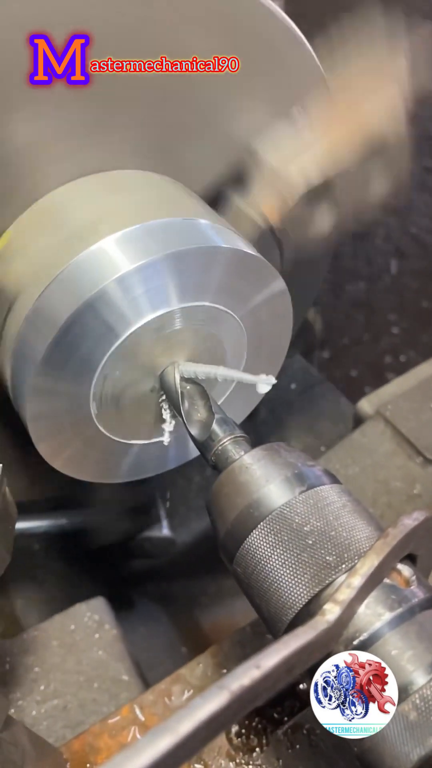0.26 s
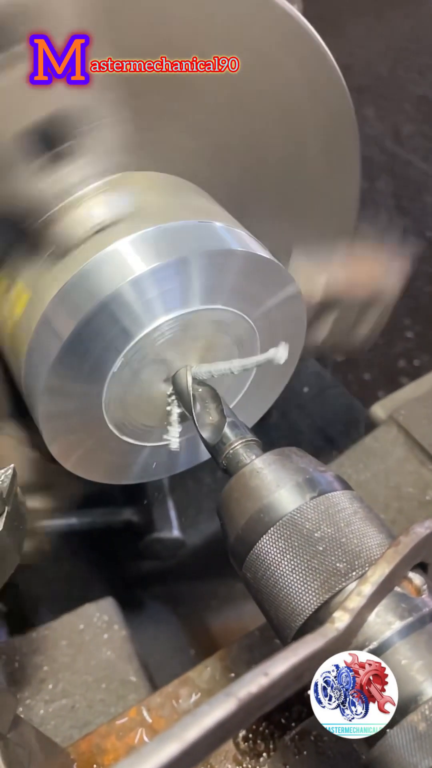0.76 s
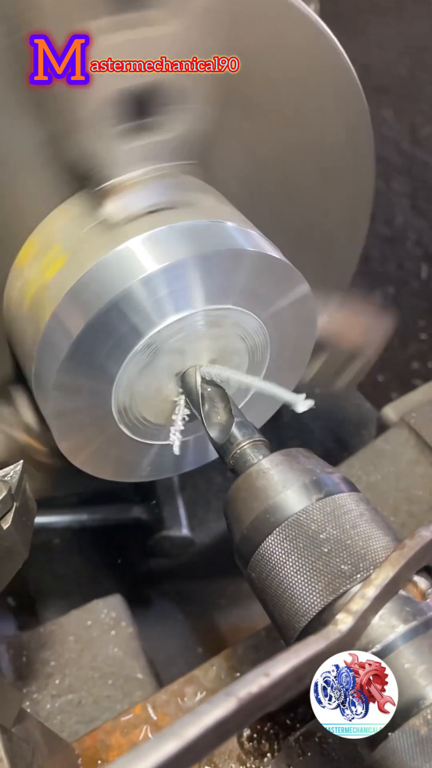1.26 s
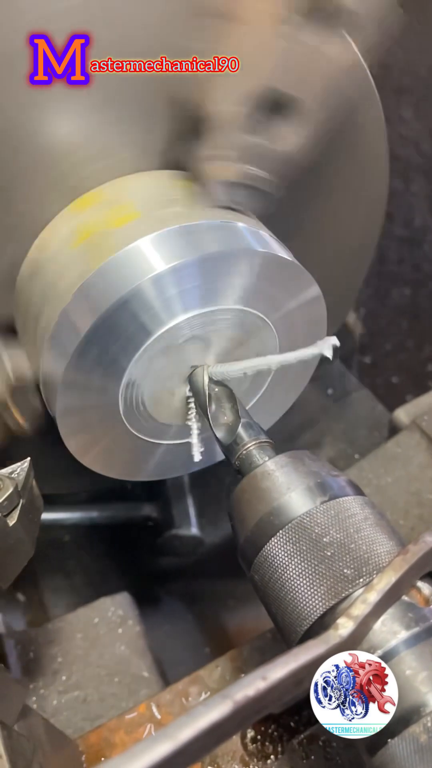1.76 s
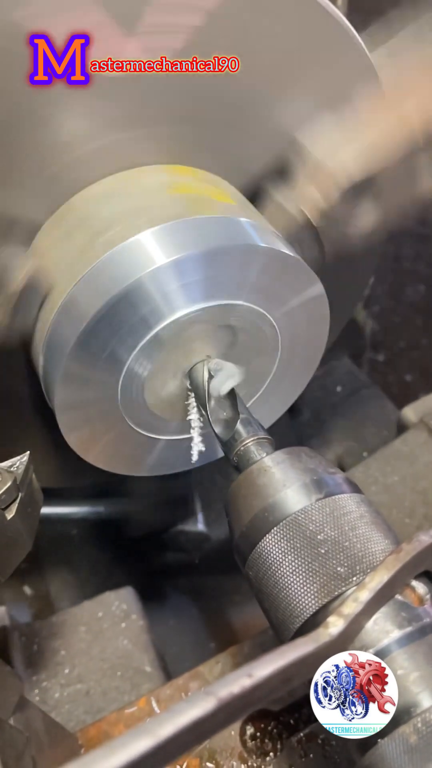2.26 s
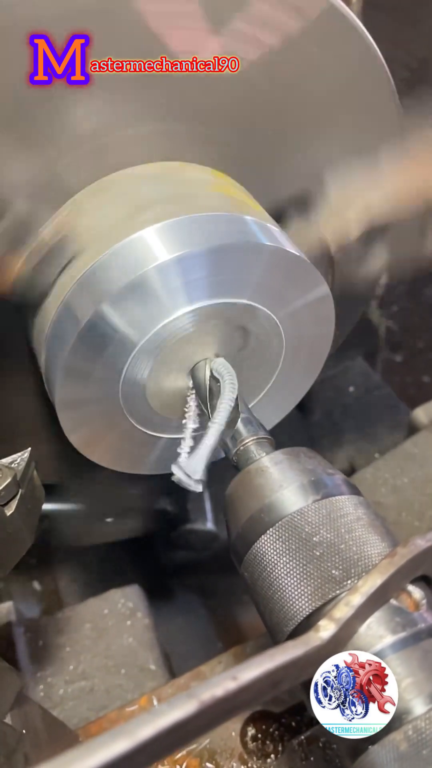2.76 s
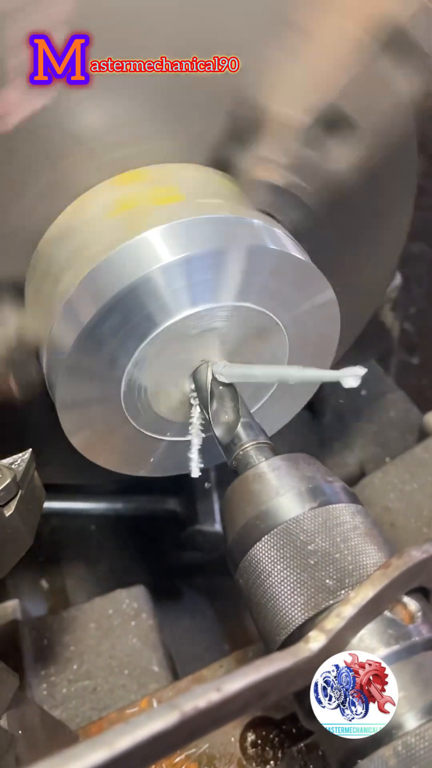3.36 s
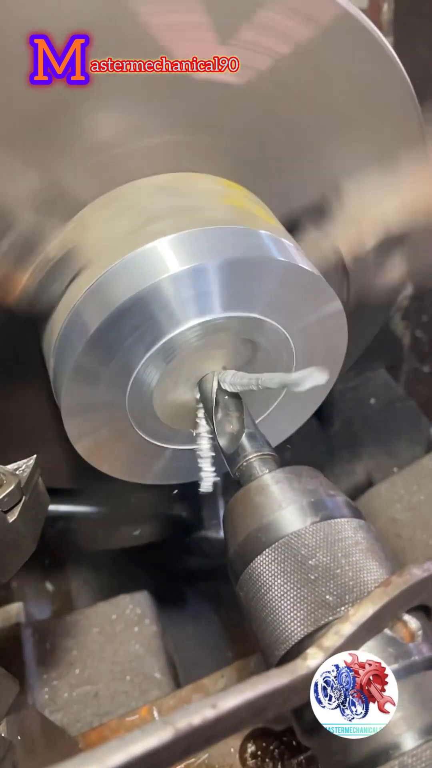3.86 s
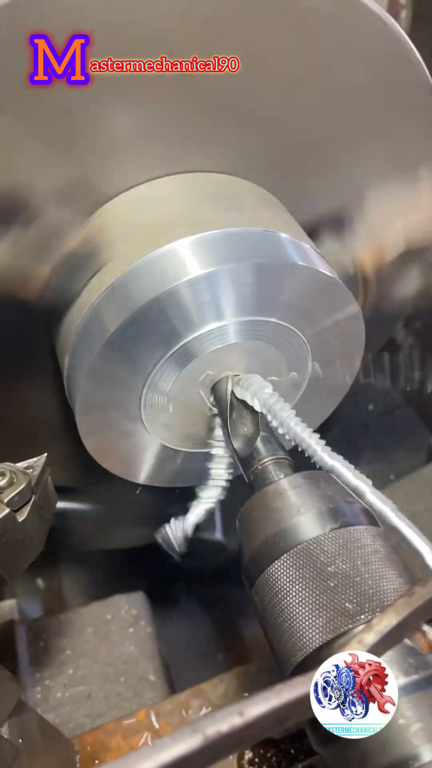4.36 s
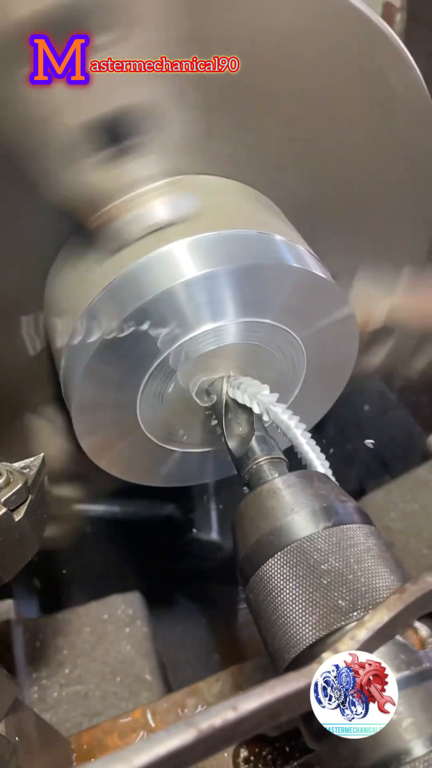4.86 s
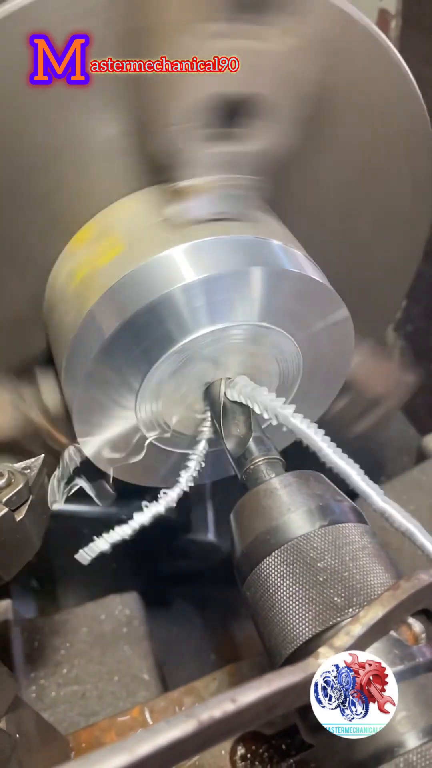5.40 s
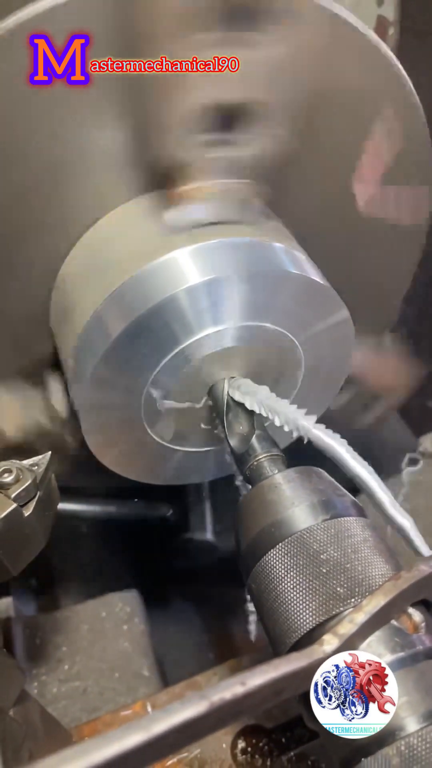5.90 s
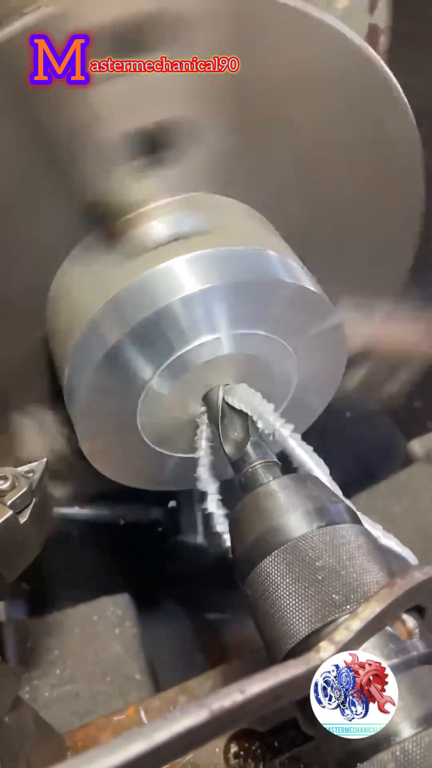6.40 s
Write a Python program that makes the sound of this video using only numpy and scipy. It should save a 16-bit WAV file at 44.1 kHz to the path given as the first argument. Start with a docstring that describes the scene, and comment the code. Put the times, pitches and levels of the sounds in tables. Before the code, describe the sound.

Slowed, muffled machine rumble and drill hiss ramp up in pitch and loudness to bright squealing drilling, ending in a brief broad scraping cut.

```python
"""Gear whine and gearbox roar come first, at quarter speed and held down in level, with the drill's hiss over them.
Place: a workshop lathe drilling a steel part; distance: close; microphone: one phone with two ports.
Playback steps up to full speed and gets louder; after the last splice a boring bar cuts instead of the drill.
Hiss, roar and boring are shaped noise with resonances, gears and hum are sines, the squeal is a tone with noise.
"""
import sys
import numpy as np
from scipy import signal
from scipy.fft import rfft, irfft, next_fast_len
from scipy.io import wavfile
from scipy.ndimage import uniform_filter1d, map_coordinates

SR = 44100
rng = np.random.default_rng(int(sys.argv[2]) if len(sys.argv) > 2 else 0)


def int16_out(signal):
    """Quantize to a 16-bit WAV file."""
    q = np.round(np.clip(np.atleast_2d(signal).T, -1, 1) * 32767)
    wavfile.write(sys.argv[1], SR, q.astype(np.int16))


N = 292824  # samples as played

# In every table t is as played, f is at workshop speed, and source levels are before the playback volume.
# Spectrum and mode levels set only the shape of a layer, which is then brought to rms 1.

# Layers of the drilling noise: t/s, then level/dB of rub, upper rub, low whistle, high whistles, sizzle, fizz
DRILL_FEED = [(0, -31.5, -47.5, -32.5, -49.5, -84, -62.5), (1.2, -29, -48, -35, -47, -95, -64.5),
              (2.5, -28.5, -41.5, -43, -45, -63, -60.5), (4.17, -30, -42, -50, -45, -53.5, -61),
              (4.19, -27.5, -38.5, -35.5, -46.5, -50, -52.5), (5.14, -27, -37, -43, -46.5, -49.5, -55.5),
              (5.6, -27.5, -39, -35, -43, -56, -50.5), (6.45, -26.5, -37, -35.5, -40.5, -52.5, -58)]
# Drill rubbing on steel: f/Hz, level/dB per Hz
RUB_SPECTRUM = [(1500, -120), (3000, -26), (4500, -13), (5000, -13.5), (6300, -7.5), (7700, -9.5),
                (8800, -3.5), (9500, -13), (10500, -16), (11000, -20), (12100, -24), (12700, -45.5),
                (13200, -120)]
# Modes of drill, chuck and tailstock rung by the rubbing: f/Hz, width/Hz, level/dB per Hz
TOOLING_MODES = [(3050, 55, -15), (4235, 150, -5), (4446, 51, -3.5), (4630, 24, -3), (5580, 250, -4),
                 (6470, 60, -13), (6540, 180, -6), (7205, 140, -4.5), (8350, 36, -1), (8700, 120, -3.5),
                 (8830, 73, 2.5), (9800, 150, -7), (9890, 150, 1.5), (10360, 160, -3.5)]
# Thin modes of the flutes: f/Hz, width/Hz, level/dB
LOW_WHISTLE_MODES = [(10085, 85, 0)]
# High thin whistles: f/Hz, width/Hz, level/dB
HIGH_WHISTLE_MODES = [(11385, 75, 0), (12290, 55, -10)]
# Two finer layers: f/Hz, level/dB
SIZZLE_SPECTRUM = [(11000, -54.5), (11800, 8.5), (12700, 3), (13300, -4), (15200, -8.5), (16000, -54)]
FIZZ_SPECTRUM = [(15000, -52.5), (15500, -21), (17000, 3.5), (17900, 9), (19000, 6.5), (19350, -2.5),
                 (19800, -82.5)]
UPPER_HZ = 10420  # crossover; the hiss above this has its own level column, weak at first and stronger later


def drill(n):
    """Rubbing hiss surging in the tooling's modes, with thin whistles and the finer sizzle and fizz."""
    levels_db = [np.interp(np.arange(n), real_time(), c) for c in curves(DRILL_FEED)]
    rub_db, upper_db, low_db, high_db, sizzle_db, fizz_db = levels_db
    rub = both(RUB_SPECTRUM, TOOLING_MODES)

    def upper_share(hz):
        """Share of the rubbing's power in the upper part, crossing over within 300 Hz."""
        return np.clip(.5 + (hz - UPPER_HZ) / 300, 0, 1)

    def lower_rub(hz):
        """Gain of the rubbing below the crossover."""
        return rub(hz) * np.sqrt(1 - upper_share(hz))

    def upper_rub(hz):
        """Gain of the rubbing above the crossover."""
        return rub(hz) * np.sqrt(upper_share(hz))

    surge_db = 0.58 * wobble(16, n)  # shared by both parts of the rubbing
    hiss = amp(rub_db + surge_db) * noise(lower_rub, n, patchy_db=2.0, span=8)
    hiss += amp(upper_db + surge_db) * noise(upper_rub, n, patchy_db=2.0, span=8)
    hiss += amp(low_db) * noise(ringing(LOW_WHISTLE_MODES), n, patchy_db=3.0, span=4)
    hiss += amp(high_db) * noise(ringing(HIGH_WHISTLE_MODES), n, patchy_db=2.5, span=4)
    sizzle_surge_db = 3 * wobble(16, n)
    hiss += amp(sizzle_db + sizzle_surge_db) * noise(shaped(SIZZLE_SPECTRUM), n, patchy_db=2.8, span=10)
    return hiss + amp(fizz_db) * noise(shaped(FIZZ_SPECTRUM), n, patchy_db=1.5, span=10)


# Steady squeal, which dips and later grows as the drill bites deeper: t/s, level/dB
STEADY_SQUEAL = [(0, -48.5), (2, -55.5), (3.4, -52), (4.17, -44.5), (4.19, -47.5), (5.1, -38.5), (5.5, -39),
                 (6.45, -38.5)]
# The edge catches and the squeal flares: t/s of the middle, length/s as played, level/dB
EDGE_CATCHES = [(4.314, 0.027, -30), (4.544, 0.023, -26), (4.705, 0.017, -22), (4.778, 0.057, -30.5),
                (4.875, 0.044, -31.5), (4.965, .03, -37), (5.07, 0.036, -27), (5.134, .025, -26),
                (5.523, 0.026, -47), (5.573, .025, -35.5), (5.606, .03, -42), (5.878, .029, -34),
                (5.941, 0.041, -29), (6.024, 0.025, -27.5), (6.09, 0.076, -33), (6.115, 0.013, -28),
                (6.165, 0.017, -26), (6.21, .03, -34), (6.252, 0.039, -26.5), (6.346, .053, -29.5),
                (6.412, 0.056, -28.5)]
# Pitch before drift and playback speed: t/s, f/Hz
SQUEAL_PITCH = [(4.1, 5620), (4.54, 5720), (4.8, 5600), (5.1, 5680), (5.52, 5760), (5.58, 5650),
                (5.9, 5745), (6.12, 5705), (6.3, 5740)]
# Modes rung by the rough part: f/Hz, width/Hz, level/dB
SHANK_MODES = [(5730, 190, 0), (11390, 60, -16)]


def squeal(n):
    """Stick-slip at the cutting edge: a fluttering tone with rough noise around it; both flare at each catch."""
    t, now = np.arange(N) / SR, real_time()
    flares = sum(amp(db) * np.exp(-(2 * (t - s) / length) ** 2) for s, length, db in EDGE_CATCHES)
    steady = amp(curves(STEADY_SQUEAL)[0])
    flutter, drift = [np.interp(now, np.arange(n), wobble(rate, n)) for rate in (130, 90)]
    workshop_hz = curves(SQUEAL_PITCH)[0] + 25 * drift
    speed = np.gradient(now)
    phase = 2 * np.pi * np.cumsum(workshop_hz * speed) / SR
    side_phase = np.array([[-.08], [.08]])  # rad, left and right
    tone = amp(2.4 * flutter) * np.sin(phase + side_phase)
    rough = played(noise(ringing(SHANK_MODES), n, patchy_db=0.6, span=60))
    rough_size = amp(-2.5) * steady + amp(-14.5) * flares
    return (steady + flares) * tone + rough_size * rough


# Cutting noise of the boring bar: f/Hz, level/dB per Hz
BORING_SPECTRUM = [(20, -10), (45, -7), (200, -5.5), (400, -8), (950, -1.5), (1300, -12), (1750, -3),
                   (2200, -6), (3000, -10.5), (4800, -27), (5400, -19.5), (6300, -28), (10000, -24.5),
                   (11500, -34.5), (12400, -71.5)]
# Modes of the bar: f/Hz, width/Hz, level/dB
BAR_MODES = [(970, 63, -0.5), (1820, 28.8, -4), (3070, 40, -4.5), (3300, 35, -17), (5530, 91, -24.5)]


def boring_bar(n):
    """Broad cutting noise with the bar's own modes standing on it."""
    return amp(-20.0) * noise(both(BORING_SPECTRUM, BAR_MODES), n, patchy_db=2.5, span=3)


# Two gear pairs, and other tones of the drive: f/Hz
MESH_HZ, HUM_HZ = (850.8, 916), (371, 457.6, 716, 895.5)
# Those tones and harmonics of the gear pairs:
# f/Hz, level/dB while drilling, level/dB while boring, left lead/rad, left-right level/dB, unsteadiness/dB
GEAR_TONES = [(MESH_HZ[0], -30, -35, 1.5, 2.5, 2.2), (2 * MESH_HZ[0], -32.5, -35, 0.1, .3, 1.3),
              (3 * MESH_HZ[0], -48, -38, 1.1, -.3, 3), (4 * MESH_HZ[0], -54, -54, 1.6, .3, 4), (MESH_HZ[1],
              -38, -41, 1.1, -1, 3.5), (2 * MESH_HZ[1], -43, -40, 0.1, .3, 4), (HUM_HZ[0],
              -44, -49, .2, .3, 3), (HUM_HZ[1], -43, -45, .3, .3, 4), (HUM_HZ[2], -44, -46, .8, .3, 3),
              (HUM_HZ[3], -41, -46, 1.2, .3, 3.5)]


def gears(n):
    """Tones waver in size and phase as the load on the teeth changes, a little apart on each side."""
    t = np.arange(n) / SR
    boring = np.arange(n) > real_time()[round(SPLICE_TIMES[-1] * SR)]
    out, side = np.zeros((2, n)), np.array([[.5], [-.5]])
    for hz, drill_db, bore_db, lead, pan_db, unsteady_db in GEAR_TONES:
        waver_db = unsteady_db * np.array([wobble(24.98, n), wobble(25.32, n)])
        size = amp(np.where(boring, bore_db, drill_db) + pan_db * side + waver_db)
        shared_turn = .12 * unsteady_db * wobble(30, n)
        side_turn = (lead + .25 * unsteady_db * wobble(22.45, n)) * side
        out += np.sqrt(2) * size * np.sin(2 * np.pi * hz * t + shared_turn + side_turn)
    return out


# A low hum that swells once a spindle turn: t/s of the peak, level/dB, length/s in workshop time
HUM_SWELLS = [(1.266, -30.5, 0.03), (3.206, -31, 0.031), (4.6, -31.5, 0.042), (5.615, -29.5, 0.023),
              (6.099, -28, 0.053)]
SWELL_HZ = 301.2  # at workshop speed


def swells(n):
    """The low hum rises and fades around each peak, alike on both sides."""
    t = np.arange(n) / SR
    size = np.zeros(n)
    for s, db, length in HUM_SWELLS:
        peak_s = real_time()[round(s * SR)] / SR
        size += amp(db) * np.exp(-.5 * ((t - peak_s) / length) ** 2)
    return np.sqrt(2) * size * np.sin(2 * np.pi * SWELL_HZ * t) * np.ones((2, 1))


# Gearbox and bed: f/Hz, level/dB per Hz
ROAR_SPECTRUM = [(15, -26), (45, -6.5), (100, -8), (250, -3.5), (500, -1.5), (900, 3), (1100, -3),
                 (1350, -7), (1750, 0.5), (2000, -4), (2550, -4.5), (2900, -10.5), (4400, -14), (6000, -49),
                 (9000, -120)]


def gearbox_roar(n):
    """Broad noise of gearbox and bed, at a constant level under the drilling."""
    return amp(-24) * noise(shaped(ROAR_SPECTRUM), n, patchy_db=1.74, span=3)


# Stereo image of the noise by frequency:
# f/Hz, likeness 0-1, left lead/rad beyond a common delay, left-right level/dB
STEREO_IMAGE = [(40, .985, 0, .1), (200, .979, -.27, .6), (550, .544, -.5, -2.2), (900, .56, .7, 0),
                (1250, .322, -.8, -1.1), (1600, .8, -1.55, 1.1), (2200, .498, -2, -.7),
                (2700, .414, .65, -1.5), (4000, .7, -3, -.5), (4650, .624, -1.6, -3), (5700, .944, .45, 1),
                (6500, .87, .5, -2.5), (8200, .92, .75, 0), (9150, .995, .3, 0), (9600, .995, -.1, 0),
                (11200, .8, .4, 0), (12700, .995, -.1, 0), (19000, .92, -.4, 0)]
NEAR_LEAD_S = .000158  # the common delay: the near drill reaches the left port first; used for all noise
EDGE_HZ = 19500  # upper limit of the noise at workshop speed


def noise(gain, n, patchy_db, span):
    """Stereo noise of rms 1 with the image above and patches of random gain, smoothed over span bands."""
    z = signal.stft(rng.standard_normal((2, n)), nperseg=256)[2]
    field = uniform_filter1d(rng.standard_normal(z.shape[1:]), size=span, axis=0)
    field = uniform_filter1d(field, size=8, axis=1)
    pair = signal.istft(z * amp(patchy_db * unit(field)), nperseg=256)[1]
    hz = np.fft.rfftfreq(n, 1 / SR)
    a, b = rfft(pair, n) * gain(hz) * (hz < EDGE_HZ)
    alike, beyond, pan_db = along(STEREO_IMAGE, hz)
    lead = 2 * np.pi * hz * NEAR_LEAD_S + beyond
    turn = np.arccos(np.clip(alike, -1, 1)) / 2  # mixing angle that gives the likeness
    left = (np.cos(turn) * a + np.sin(turn) * b) * np.exp(.5j * lead) * amp(pan_db / 2)
    right = (np.cos(turn) * a - np.sin(turn) * b) * np.exp(-.5j * lead) * amp(-pan_db / 2)
    return unit(irfft([left, right], n))


# Playback steps: t/s, speed as a share of real time
SPEED_STEPS = [(0, .25), (5.15, .375), (5.256, .5), (5.333, .625), (5.381, .75), (5.408, 1)]


def real_time():
    """Workshop time in samples reached at each played sample."""
    s, speed = np.transpose(SPEED_STEPS)
    step = np.searchsorted(s, np.arange(N) / SR, "right") - 1
    return np.cumsum(speed[step])


def played(x):
    """Workshop sound read out at the playback speed, so pitch and tempo change together."""
    fine = signal.resample(x, 4 * x.shape[1], axis=1)  # finer grid for clean reading between samples
    return np.array([map_coordinates(c, [4 * real_time()], mode="grid-wrap") for c in fine])


def wobble(rate, n):
    """A smooth random curve of n samples, rate knots a second."""
    knots = rng.standard_normal(int(n * rate / SR) + 4)
    return map_coordinates(knots, [np.arange(n) * rate / SR])


def shaped(points):
    """Gain of an (f/Hz, level/dB) spectrum."""
    return lambda hz: amp(along(points, hz)[0])


def ringing(modes):
    """Gain of (f/Hz, width/Hz, level/dB) resonances."""
    return lambda hz: sum(amp(db) / (1 + ((hz - c) / w) ** 2) ** 1.61 for c, w, db in modes)


def both(spectrum, modes):
    """Gain of a broad spectrum with resonances standing on it."""
    return lambda hz: np.hypot(shaped(spectrum)(hz), ringing(modes)(hz))


def along(points, hz):
    """One value per frequency for each column, read on a log axis."""
    f, *cols = np.transpose(points)
    return [np.interp(np.log(hz + 1), np.log(f + 1), c) for c in cols]


def curves(rows):
    """One value per played sample for each column after the time."""
    s, *cols = np.transpose(rows)
    return [np.interp(np.arange(N) / SR, s, c) for c in cols]


def amp(db):
    """Amplitude factor of a level in dB."""
    return 10 ** (np.asarray(db) / 20)


def unit(x):
    """The signal brought to rms 1."""
    return x / np.sqrt(np.mean(x ** 2) + 1e-20)


# Playback volume, for all but the boring bar's noise: t/s, level/dB
PLAYBACK_VOLUME = [(0, -12), (5.12, -12), (5.17, -16), (5.385, -16), (5.41, -9), (5.46, -4.5), (5.52, 0.5),
                   (6.64, -0.5)]
# Sound stops at once and fades in again; the boring bar follows the last one: t/s
SPLICE_TIMES = [4.178, 6.456]
CUT_S, FADE_IN_S = 0.0003, 0.024  # at a splice


def scene():
    """Drilling up to the last splice, boring after it, and gear whine throughout."""
    n = next_fast_len(int(real_time()[-1]) + 64)  # workshop samples
    volume = amp(curves(PLAYBACK_VOLUME)[0])
    workshop = drill(n) + swells(n) + gearbox_roar(n)
    drilling = volume * (played(workshop) + squeal(n))
    boring = played(boring_bar(n))
    t = np.arange(N) / SR
    mix = np.where(t < SPLICE_TIMES[-1], drilling, boring) + volume * played(gears(n))
    for s in SPLICE_TIMES:
        mix = mix * np.clip(np.where(t < s, (s - t) / CUT_S, (t - s) / FADE_IN_S), 0, 1)
    return mix


TOP_HZ = 15170  # band limit of the sound as played


def record(dry):
    """Nothing is kept above the band limit."""
    m = next_fast_len(N + SR // 4)
    kept = np.fft.rfftfreq(m, 1 / SR) < TOP_HZ
    return irfft(rfft(dry, m) * kept, m)[:, :N]


dry = scene()
out = record(dry)
int16_out(out)
```